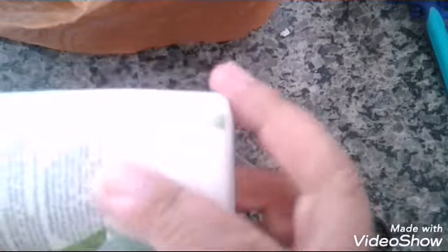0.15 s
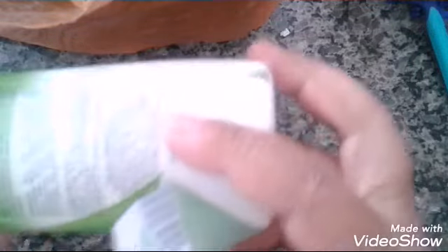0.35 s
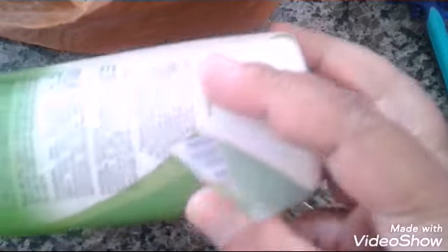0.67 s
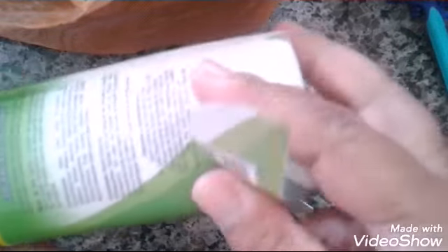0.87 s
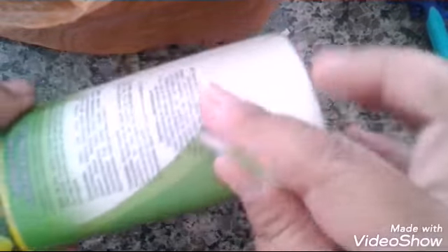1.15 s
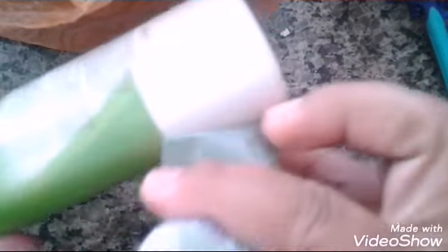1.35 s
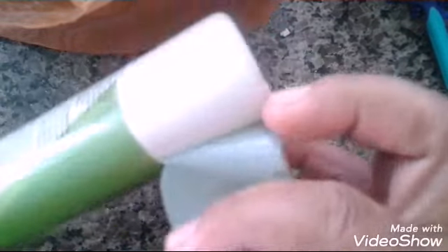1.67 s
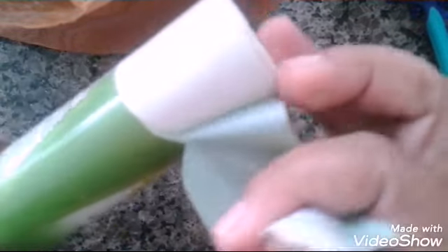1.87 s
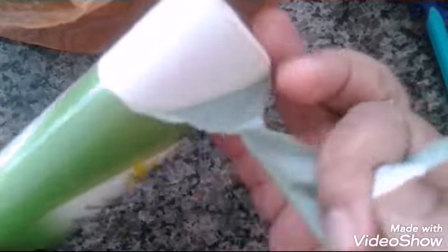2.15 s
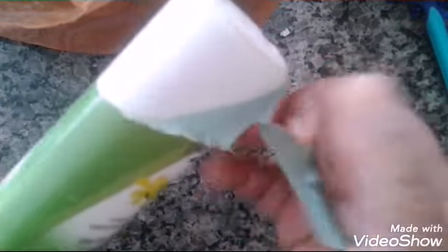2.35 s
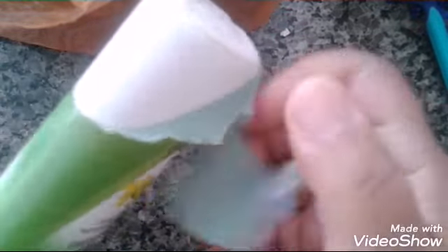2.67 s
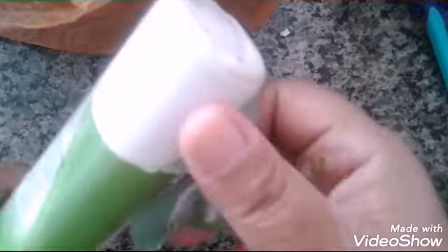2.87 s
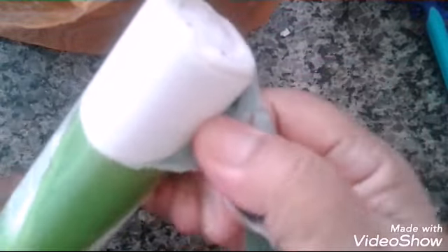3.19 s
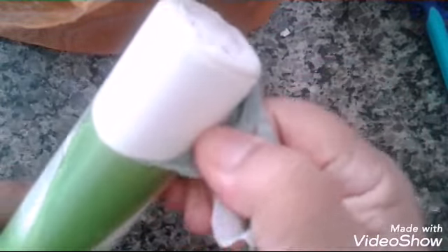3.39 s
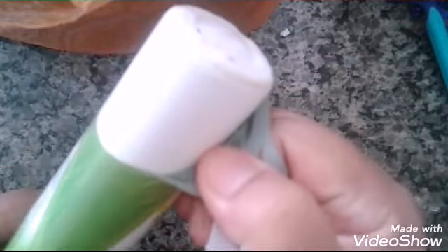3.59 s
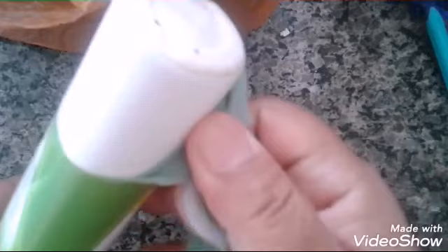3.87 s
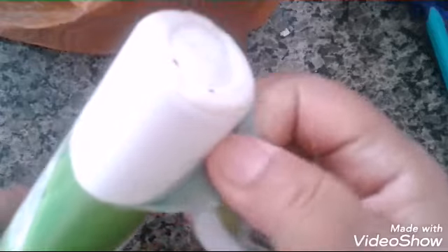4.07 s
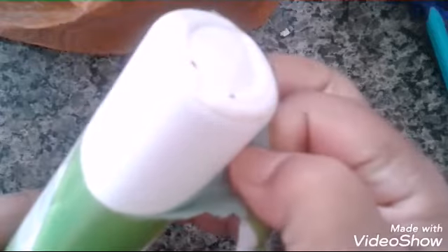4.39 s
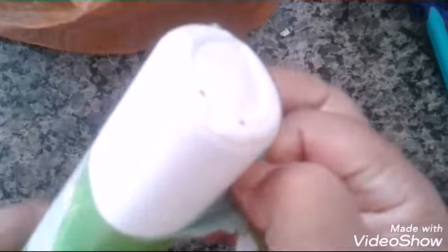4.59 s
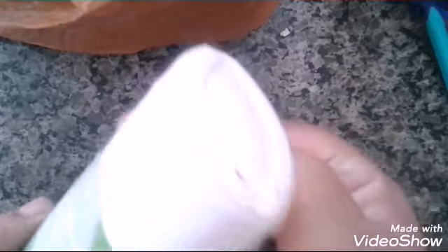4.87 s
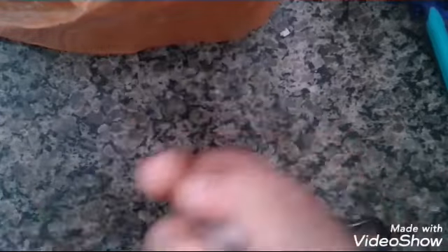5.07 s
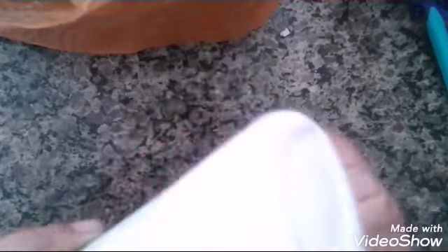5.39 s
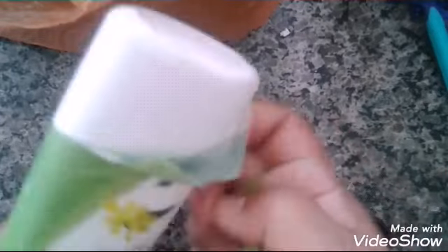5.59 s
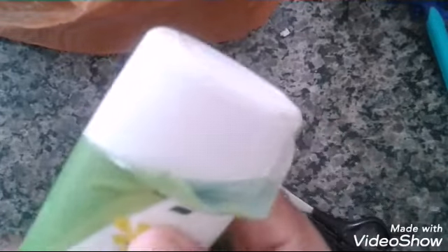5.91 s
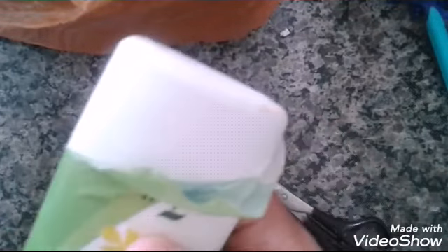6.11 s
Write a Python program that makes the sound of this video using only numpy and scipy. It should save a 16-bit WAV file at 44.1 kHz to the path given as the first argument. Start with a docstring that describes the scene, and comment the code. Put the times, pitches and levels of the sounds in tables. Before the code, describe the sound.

Fingers pick at a stiff label on an empty plastic bottle, making a few faint ticks and rubs. The label then peels away in irregular runs of sharp snaps and crinkles, mixed with soft hollow knocks from the bottle. Near the end a loud snap comes with a hollow thump, followed by lighter crackles. The sound is close to the microphone in a small, hard room with a faint machine hum.

```python
"""Peeling a label off a bottle

A stiff label comes off an empty plastic bottle, close to a phone's two microphones in a small hard
room. The label snaps as it buckles and lets go of the glue; fingers rub and knock the hollow bottle.
The walls return each snap as a short wash over a faint machine hum."""
import sys
import numpy as np
from scipy import signal
from scipy.fft import rfft, irfft
from scipy.io import wavfile
from scipy.ndimage import uniform_filter1d

SR = 44100
rng = np.random.default_rng(int(sys.argv[2]) if len(sys.argv) > 2 else 0)


def master_out(mix):
    """Clip the mix to full scale and print it as 16-bit PCM to the path in sys.argv[1]."""
    frames = np.transpose(np.atleast_2d(mix))
    ceiling = np.clip(frames, -1, 1)
    pcm = np.round(ceiling * 32767).astype(np.int16)
    wavfile.write(sys.argv[1], SR, pcm)


N = 275610


def undb(db):
    return 10 ** (np.asarray(db) / 20)


def on_log(hz, table, column=1):
    """Table value at hz, straight lines on a log-frequency axis."""
    rows = np.array(table, float)
    return np.interp(np.log(np.maximum(hz, 1)), np.log(rows[:, 0]), rows[:, column])


def colour(x, table):
    """Shape a noise by (Hz, dB) points; rms 1."""
    y = irfft(rfft(x) * undb(on_log(np.arange(N // 2 + 1) * SR / N, table)), N)
    return y / np.sqrt(np.mean(y ** 2))


def band(x, hz, width_hz):
    """Two passes through one resonance; peak 1."""
    b, a = signal.iirpeak(hz, hz / width_hz, SR)
    y = signal.lfilter(b, a, signal.lfilter(b, a, x))
    return y / np.max(np.abs(y))


def walk(rate_hz):
    """Random levels, joined by ramps; spread near 1."""
    k = int(SR / rate_hz)
    return uniform_filter1d(np.repeat(rng.standard_normal(N // k + 1), k), k)[:N]


def add(out, start_s, x):
    i = int(start_s * SR)
    out[..., i:i + x.shape[-1]] += x[..., :N - i]


def room_tone():
    """A wavering machine hum, alike at both microphones, over air noise shared only in the bass."""
    # machine tones: pitch_hz, level_db
    tones = [(96.9, -75), (118.4, -68.5), (193.8, -69.5)]
    # rise and fall of the hum: time_s, gain_db
    swell = [(0, -5.5), (.9, 0.5), (1.202, 3.5), (2.55, 4), (2.75, -1), (6.25, -4.5)]
    # air noise spectrum: frequency_hz, gain_db
    air_colour = [(20, -17.5), (49, -1.5), (118, 7.5), (158, -4), (205, 3), (242, -3.5), (1990, -22),
                  (5690, -12.5), (6530, -13), (13800, -28.5), (15000, -44.5)]
    swell_db = np.interp(np.arange(N) / SR, *np.transpose(swell))
    hum = np.zeros(N)
    for hz, db in tones:
        level = undb(db + swell_db + 2.0 * walk(17))
        hum += level * np.sin(2 * np.pi * np.cumsum(hz + 1.647 * walk(6.7)) / SR)
    mid, side = (colour(rng.standard_normal(N), air_colour) for _ in range(2))
    side = signal.lfilter(*signal.butter(1, 180, "high", fs=SR), side)
    return hum + undb(-70 + 0.5 * swell_db) * np.array([mid + side, mid - side])


def wall_echoes(x):
    """Hard walls return a dense wash; long waves reach the two microphones nearly alike."""
    # bands of the wash: centre_hz, t60_s, level_db
    bands = [(307, 0.48, -15.5), (970, 0.24, -21.5), (2310, 0.24, -20.5), (4130, 0.52, -30),
             (9900, 0.25, -17)]
    t, out = np.arange(int(.7 * SR)) / SR, []
    slap = 1 + undb(-5) * np.exp(-((t - 0.012) / 0.0035) ** 2)  # one wall answers distinctly
    common = rng.standard_normal((len(bands), len(t)))
    for _ in range(2):
        wash = np.zeros(len(t))
        for (hz, t60, db), shared in zip(bands, common):
            noise = shared + min(hz / 1480, 1) * (rng.standard_normal(len(t)) - shared)
            wash += undb(db) * signal.lfilter(*signal.iirpeak(hz, 1, SR), noise) * 1000 ** (-t / t60)
        out.append(signal.fftconvolve(x, wash * undb(-15.5) * slap)[:N])
    return np.array(out)


def finger_rub():
    """Skin slides on the label in strokes of tiny ticks over a hiss; the bottle wall answers lower."""
    # finger strokes: middle_s, length_s, level_db, wall_relative_db
    strokes = [(0.265, 0.14, -61, -18), (0.382, 0.18, -64.5, -9), (0.455, 0.14, -57, -24),
               (0.544, 0.18, -65, -12), (0.708, 0.066, -62, -17), (0.846, 0.074, -63.5, -13.5),
               (0.958, 0.062, -49, -23), (1.048, 0.2, -60, -20), (1.185, 0.19, -56, -24),
               (1.477, 0.12, -56, 1.5), (1.772, 0.053, -48.5, -14), (1.94, 0.41, -58, -16.5),
               (2.421, 0.073, -35, -25.5), (2.635, 0.3, -47, -37), (2.712, 0.035, -36.5, -40),
               (3.882, 0.075, -58, -8), (4.055, 0.019, -40.5, -16), (4.161, 0.076, -50.5, -20.5),
               (5.535, 0.23, -63.5, -15.5), (5.697, 0.26, -49, -34), (5.824, 0.033, -38, -58),
               (6.038, 0.19, -60.5, -13)]
    # rubbed label spectrum: frequency_hz, gain_db
    label_colour = [(200, -11), (1000, -26.5), (2500, -9), (3700, -3.5), (4800, 3), (5300, 0.5),
                    (5900, 3.5), (7000, -3), (9000, -13.5), (14000, -29), (15000, -45)]
    # bottle wall spectrum: frequency_hz, gain_db
    wall_colour = [(150, 0), (400, 0.5), (1300, -7.5), (2200, -5), (4000, -36.5)]
    t, label, wall = np.arange(N) / SR, np.zeros(N), np.zeros(N)
    for middle_s, length_s, db, wall_db in strokes:
        stroke = undb(db) * np.cos(np.pi * np.clip((t - middle_s) / length_s, -.5, .5)) ** 2
        label += stroke
        wall += stroke * undb(wall_db)
    ticks = rng.random(N) < 1200 / SR  # about 1200 a second
    ticks = ticks * undb(3.0 * np.minimum(rng.exponential(size=N), 3)) * rng.standard_normal(N)
    out = []
    for _ in range(2):
        drag = 0.65 * ticks / np.std(ticks) + 0.93 * rng.standard_normal(N)
        drag *= undb(5.2 * walk(67) + 1.8 * walk(24))
        out.append(label * colour(drag, label_colour) + wall * colour(drag, wall_colour))
    return np.array(out)


def fingertip_squeak(middle_s=0.94, width_s=0.0086, pitch_hz=1450):
    """A fingertip squeaks once, a faint wavering blip."""
    level = undb(-59) * np.exp(-((np.arange(N) / SR - middle_s) / width_s) ** 2)
    return level * np.sin(2 * np.pi * np.cumsum(pitch_hz + 92.0 * walk(250)) / SR)


def bottle_knocks(contact_ms=0.7, sway_hz=100, upper_hz=450, regrip_s=5.425):
    """A soft push of a finger or the counter rings the bottle; its stiff ends favour the upper modes."""
    # knocks: start_s, level_db, free_share (0 gripped tight, 1 ringing freely), upper_modes_db
    knocks = [(0.297, -54, 0.23, 2), (0.397, -46, 0.08, 7), (1.432, -40, 0.4, 10), (1.526, -35.5, 0.13, 0),
              (2.111, -42, 0.67, 59), (2.262, -31, 0, 18.5), (2.347, -34.5, 0.34, 0.5), (2.413, -46, 0, -8),
              (2.509, -48.5, 0.4, 26), (3.074, -45, 0.08, 30), (3.261, -49.5, 0.16, -2),
              (3.618, -47, 0.11, -7), (4.331, -38.5, 0.24, -8), (5.2162, -22, 0.91, -20),
              (5.91, -37.5, 0.13, -0.5), (6.013, -40, 0.15, 10), (6.055, -51, 0.3, 7)]
    # modes of the hollow bottle: pitch_hz, level_db, free_t60_s
    modes = [(78, 2, 0.056), (258, 5, 0.043), (275, -8.5, 0.82), (312, -14, 0.57), (335, -11, 0.31),
             (410, -10.5, 0.088), (562, -14, 0.15), (760, -22, 0.22), (960, -25, 0.12), (1150, -5.5, 0.17),
             (1260, -7.5, 0.16)]
    out, t = np.zeros(N), np.arange(SR // 2) / SR
    push = np.hanning(int(contact_ms * SR / 1000) + 2)
    swing = np.gradient(push)
    for start_s, db, free, upper_db in knocks:
        # a tighter grip bends the wall more: modes shift and change strength
        bend = rng.standard_normal(len(modes)) * (1 - free)
        ring = np.zeros(len(t))
        for (hz, mode_db, t60), bend_db, detune in zip(modes, 4 * bend, 1 + .04 * bend[::-1]):
            gain = undb(mode_db + bend_db + upper_db * (hz > upper_hz))
            if hz < sway_hz:
                gain *= free  # the grip holds down the sway of the whole bottle
            decay = 1000 ** (-t / (max(free, .05) * t60))
            ring += gain * np.sin(2 * np.pi * hz * detune * t) * decay
        knock = np.convolve(ring, push)[:len(t)]
        knock /= np.max(np.abs(knock))
        if start_s < regrip_s:  # the hand closes again and stops the ring
            knock *= np.exp(-np.maximum(start_s + t - regrip_s, 0) / .01)
        knock[:len(push)] += 0.06 * swing / np.ptp(swing)  # the contact itself, once in and out
        add(out, start_s, knock * undb(db))
    return out


def label_sheet(burst, ring_hz, ring_db, dull_db, bright_db):
    """Cracks excite the stiff sheet: a ring and a broad rustle, with a dull and a bright part."""
    parts = np.array([band(burst, ring_hz, 0.32 * ring_hz), undb(2.5) * band(burst, 4860, 4920)])
    # the small free flap radiates few lows
    parts = signal.lfilter(*signal.butter(4, 2210, "high", fs=SR), parts)
    parts = signal.lfilter(*signal.butter(2, 9700, fs=SR), parts)
    ring, broad = parts / np.max(np.abs(parts.sum(axis=0)))
    dull = undb(dull_db) * band(burst, hz=900, width_hz=3600)
    bright = undb(bright_db) * band(burst, hz=10100, width_hz=3500)
    return undb(ring_db) * ring + broad + dull + bright


def label_snaps(creep_s=.008, rise_ms=0.41, decay_ms=1.0, settle_per_s=220, crack_ms=0.31, pan_db=5.5):
    """The label buckles off the glue in bursts of cracks; gives the close pair and the room feed."""
    # snaps: start_s, level_db, ring_hz, dull_relative_db, bright_relative_db
    snaps = [(0.2254, -34.5, 5560, -33, -12), (0.2476, -37, 4870, -30, -28), (0.8976, -41, 5740, -22, -20),
             (1.268, -27.5, 4030, -13, -41), (1.287, -33, 3240, -16, -39), (1.335, -10.5, 6900, -22, -15.5),
             (1.337, -16.5, 3500, -27, -32), (1.435, -14, 5670, -16.5, -15), (1.4452, -9, 5410, -27, -13.5),
             (1.4938, -30, 5310, -17, -45), (1.5267, -25, 3280, -2, -21), (1.5607, -26, 5300, -46, -19),
             (1.6862, -26.5, 4620, -33, -18.5), (1.86, -28.5, 5400, -38, -31),
             (1.8915, -39, 5650, -3.5, -28), (1.9851, -10.5, 5720, -17, -15.5),
             (2.0359, -26.5, 5530, -13, -27.5), (2.1126, -7, 5100, -15, -16), (2.249, -34.5, 3700, -5, -26),
             (2.2626, -17, 3680, -15, -19), (2.288, -24.5, 4810, -24, -9), (2.2931, -8.5, 4700, -19, -15),
             (2.345, -24, 5500, -22, -18), (2.3488, -16, 4300, -18.5, -19), (2.3704, -5.5, 5300, -28, -16),
             (2.3719, -5, 5000, -19.5, -29), (2.3736, -25, 5000, -13.5, -26),
             (2.414, -23.5, 4230, -30, -13), (2.4224, -16, 4970, -23.5, -34),
             (2.5095, -30.5, 3140, -5, -15), (2.5271, -20, 4250, -35.5, -37),
             (2.5456, -19, 4800, -25.5, -17), (2.569, -27.5, 5900, -43, -10),
             (2.581, -21, 5900, -42.5, -10), (2.603, -14, 4980, -42.5, -21),
             (2.6524, -18.5, 4700, -37, -39), (2.662, -24.5, 4630, -28, -30), (2.6708, -15, 4300, -43, -24),
             (2.677, -32, 4900, -46, -41), (2.6892, -5.5, 4680, -35, -21),
             (2.7716, -27.5, 4210, -27.5, -49), (2.8495, -19.5, 5200, -28, -33.5),
             (2.8518, -18, 4300, -22, -19.5), (2.874, -28.5, 5800, -39, -36),
             (2.8823, -18, 5970, -25, -15.5), (3.0716, -14, 4800, -20, -31.5),
             (3.0745, -18.5, 5100, -24, -38.5), (3.094, -23, 4980, -37, -6),
             (3.108, -9.5, 5450, -26.5, -18), (3.1241, -20, 5000, -37.5, -35.5),
             (3.1804, -18, 4760, -19.5, -38), (3.3402, -25.5, 5460, -20.5, -34),
             (3.3838, -31, 3860, -15.5, -14), (3.4053, -30, 5630, -24, -21),
             (3.4707, -36.5, 5430, -44, -26), (3.4889, -31.5, 5550, -47, -18), (3.584, -36, 3360, -39, -22),
             (3.6843, -20, 5740, -31, -16), (3.7868, -11, 5300, -36, -13.5), (3.906, -12, 6170, -28.5, -21),
             (3.9188, -27, 3100, -40, -20.5), (3.9755, -30, 5680, -22, -9), (3.9863, -12, 4000, -26, -26),
             (3.989, -11.5, 4560, -36.5, -18), (4.006, -18, 5600, -24.5, -17),
             (4.0407, -12.5, 4770, -50, -16.5), (4.052, -22, 4760, -33.5, -33),
             (4.056, -18, 4060, -44, -19), (4.0821, -18, 4870, -26.5, -19.5),
             (4.2259, -25, 5720, -40.5, -47), (4.2826, -25.5, 4280, -29, -39),
             (4.331, -14.5, 4600, -29.5, -12.5), (4.373, -31.5, 3810, -18, -34),
             (4.4135, -34.5, 4600, -33, -19), (4.4182, -8, 4250, -27.5, -17),
             (4.4393, -32.5, 5800, -15.5, -29), (4.5327, -22.5, 6030, -24.5, -12.5),
             (4.57, -27, 4930, -19, -21), (4.628, -34.5, 5200, -30, -19), (4.667, -30.5, 5300, -20, -17),
             (4.7243, -33.5, 4600, -34, -17), (4.7442, -28, 5500, -12.5, -24),
             (4.839, -41.5, 5150, -43, -27), (4.9207, -10.5, 5740, -30.5, -20.5),
             (4.951, -11, 3930, -30, -10.5), (5.004, -13.5, 4400, -55, -18.5),
             (5.064, -16, 4500, -29.5, -24), (5.0719, -7.5, 5870, -38.5, -15),
             (5.108, -15.5, 5900, -23.5, -9.5), (5.134, -26.5, 3650, -25, -10), (5.15, -18, 4120, -33, -32),
             (5.1874, -19, 3480, -40, -12.5), (5.2063, -21, 4500, -29.5, -23.5),
             (5.212, -14, 5200, -42, -41.5), (5.2143, -11.5, 4600, -16.5, -39),
             (5.2159, -4.5, 4870, -22.5, -13), (5.2186, -5, 4680, -18, -18.5),
             (5.221, -12.5, 4500, -22.5, -17), (5.387, -33, 5000, -12.5, -28),
             (5.467, -37, 5760, -12.5, -17), (5.6257, -21, 5330, -28, -15),
             (5.6316, -21.5, 5500, -54.5, -26), (5.64, -26, 4080, -20, -20), (5.676, -42, 3150, -12, -3),
             (5.7042, -24, 5100, -26, -51), (5.8235, -29, 4200, -11.5, -25),
             (5.8284, -33, 4040, -31, -26.5), (5.8364, -32, 4800, -25, -20), (5.9128, -46, 5450, 10.5, -14)]
    near, far, t = np.zeros((2, N)), np.zeros(N), np.arange(2900) / SR - creep_s
    since_ms = np.maximum(t, 0) * 1000
    noises = rng.standard_normal((len(snaps), 2, len(t)))
    spreads = rng.standard_normal((len(snaps), 3))
    # the crease settles in a few small cracks after a snap
    cracks = (rng.random((len(snaps), len(t))) < settle_per_s / SR) * (t > 0) * np.exp(-t / 0.0079)
    cracks *= rng.exponential(size=cracks.shape)
    settling = signal.lfilter([0.25], [1, -np.exp(-1000 / SR / crack_ms)], cracks)
    first_crack = 3.2 * signal.unit_impulse(len(t), int(creep_s * SR) + 12)
    for snap, (shared, own), (stretch, aside, give), settle in zip(snaps, noises, spreads, settling):
        start_s, db, ring_hz, dull_db, bright_db = snap
        fade = np.exp(-since_ms / (decay_ms * np.exp(.2 * stretch)))
        buckle = (1 - np.exp(-since_ms / rise_ms)) * fade
        creep = undb(-28 + 4 * give) * np.exp(-np.abs(t) * 1000 / 2.3)  # the glue starts to give early
        envelope = buckle + creep + settle
        left_db = (pan_db + aside) / 2  # the label is nearer the left microphone
        # each microphone faces its own part of the sheet; the ring beams at them, the walls get less
        paths = [(near[0], shared * envelope, left_db, 0),
                 (near[1], (shared + 2.24 * own) * envelope, -left_db, 0),
                 (far, shared * settle, 0, -5.5)]
        for track, burst, side_db, ring_db in paths:
            sheet = label_sheet(burst + first_crack, ring_hz, ring_db, dull_db, bright_db)
            add(track, start_s - creep_s, sheet * undb(db + side_db))
    return near, far


def scene():
    """Label, bottle and fingers close up, with the walls and the room tone behind."""
    label, label_far = label_snaps()
    knocks = bottle_knocks()
    fingers = finger_rub() + fingertip_squeak()
    low_cut = signal.butter(3, 65, "high", fs=SR)  # deep bass below about 65 Hz is cut away
    near = signal.lfilter(*low_cut, label + knocks + fingers)
    near[1] = np.roll(near[1], 8)  # the right microphone is a few centimetres further off
    # the bottle booms close to the phone; less reaches the walls
    far = signal.lfilter(*low_cut, label_far + undb(-5) * knocks + fingers.mean(axis=0))
    return near + wall_echoes(far) + room_tone()


def record(dry):
    """Each microphone port rings and colours the sound; the loudest peaks round off; the top is cut."""
    # port response: frequency_hz, left_db, right_db
    ports = [(187, 2.5, 2.5), (1320, 8.5, 7.5), (3040, 1.5, 1), (3175, 5, 1.5), (3990, -1.5, 4),
             (4530, -1, -4), (5880, 3, -9.5), (6510, -7.5, -17), (8090, -0.5, -2.5), (12700, 6.5, 4.5),
             (14300, 11.5, 9.5), (16100, -14.5, -16.5)]
    out, size = [], 1024
    hz = np.arange(size // 2 + 1) * SR / size
    for column, x in enumerate(dry, start=1):
        cepstrum = irfft(np.log(undb(on_log(hz, ports, column))))
        cepstrum[1:size // 2] *= 2  # folding makes the response causal
        cepstrum[size // 2 + 1:] = 0
        response = irfft(np.exp(rfft(cepstrum)))
        out.append(signal.fftconvolve(x, response)[:N])
    rounded = np.tanh(1.1 * np.array(out)) / np.tanh(1.1)
    return signal.sosfilt(signal.ellip(10, .2, 90, 15800, fs=SR, output="sos"), rounded)


dry = scene()
out = record(dry)
master_out(out)
```